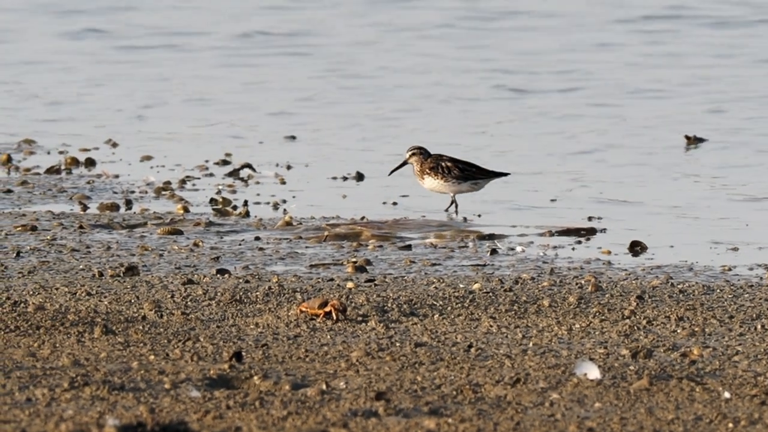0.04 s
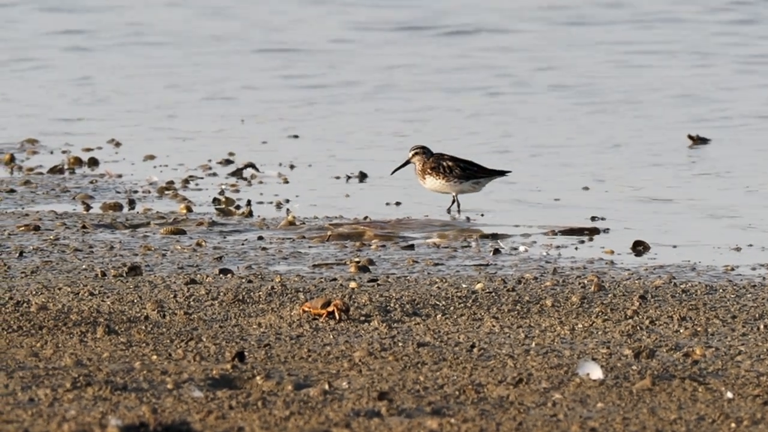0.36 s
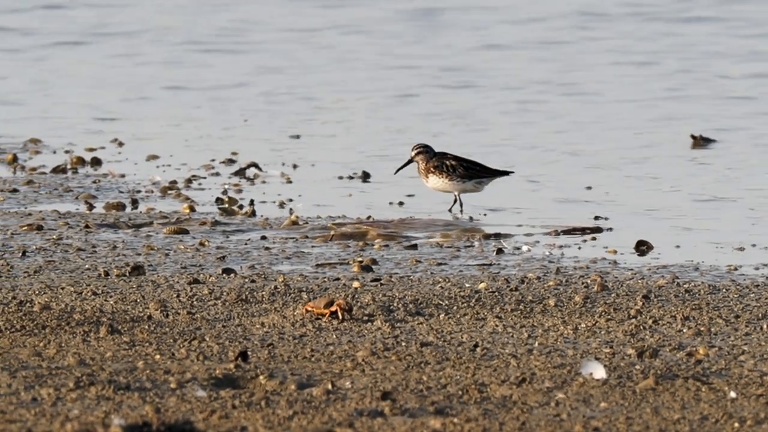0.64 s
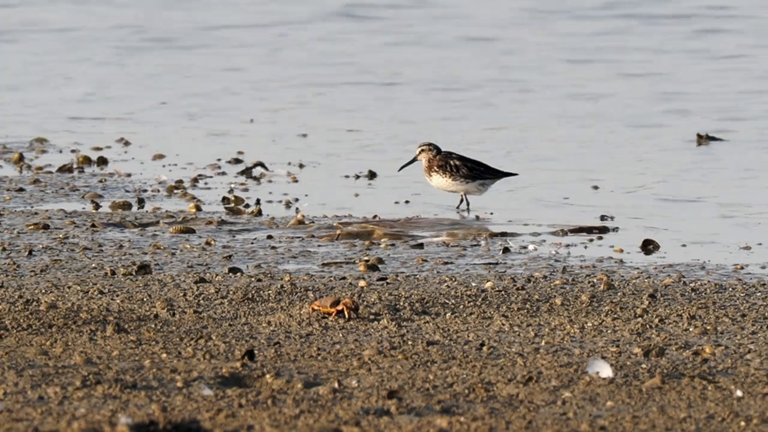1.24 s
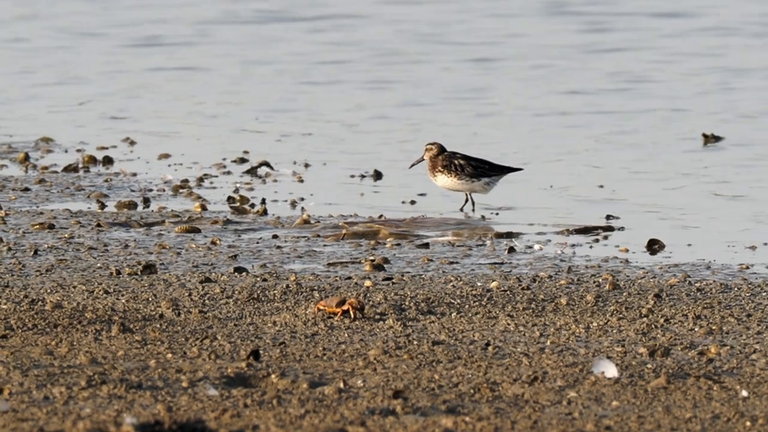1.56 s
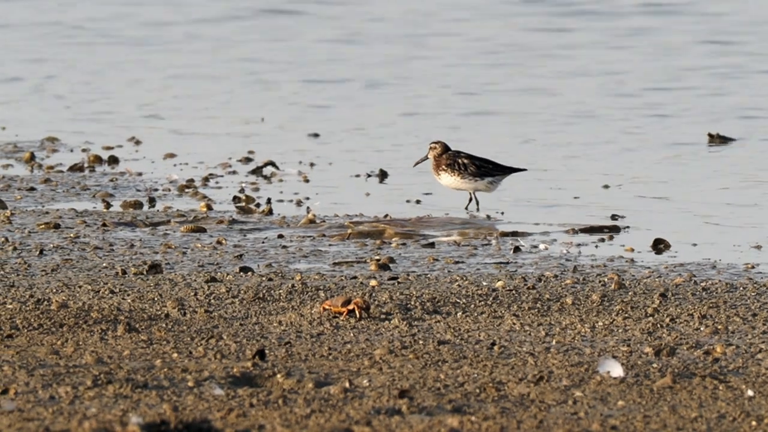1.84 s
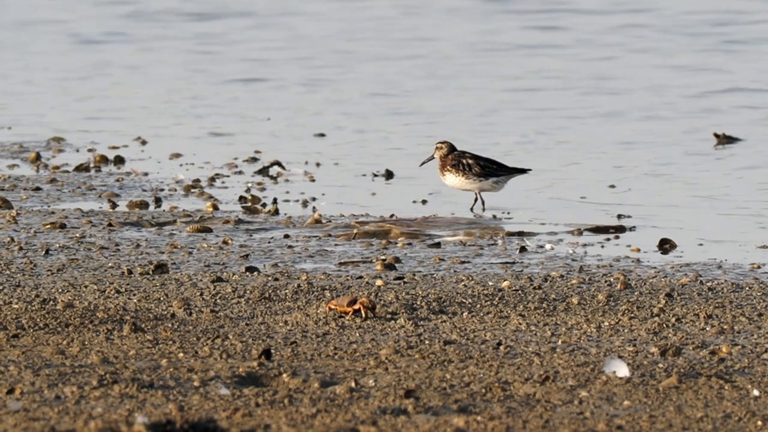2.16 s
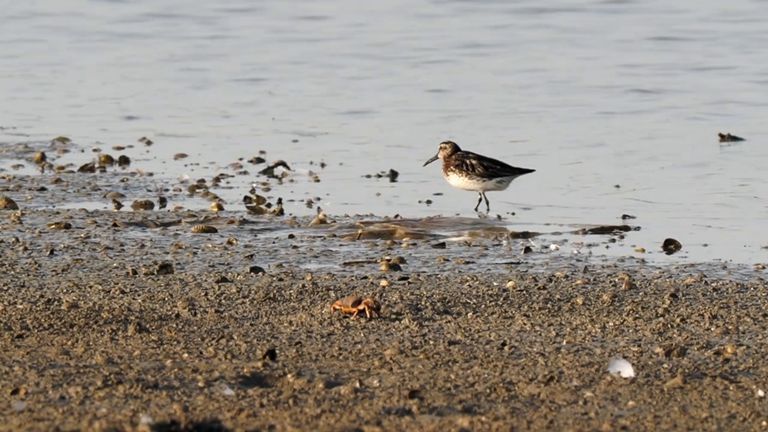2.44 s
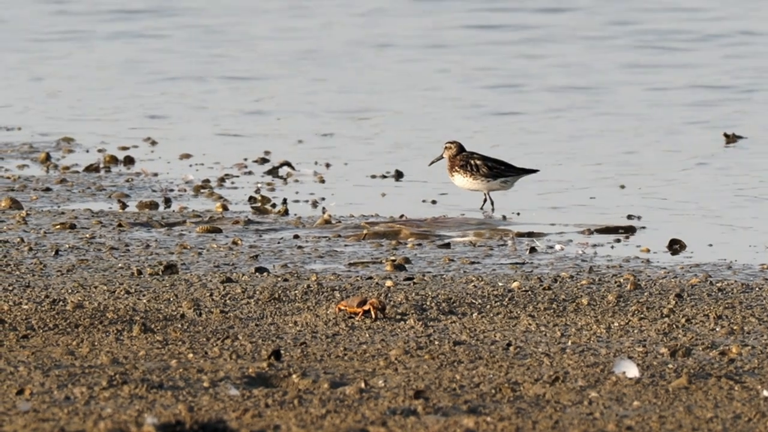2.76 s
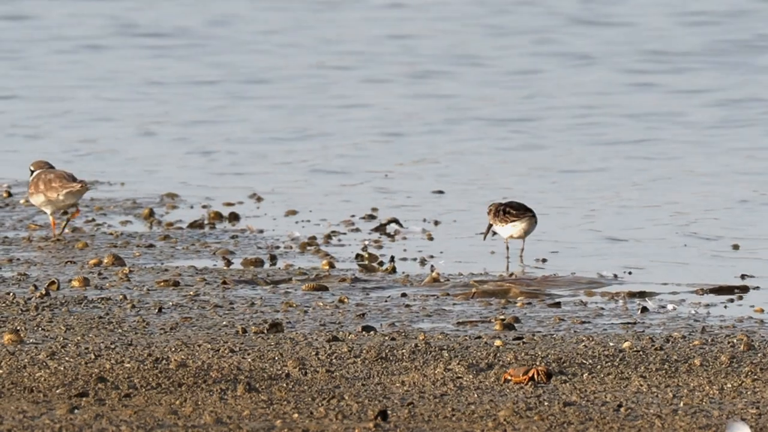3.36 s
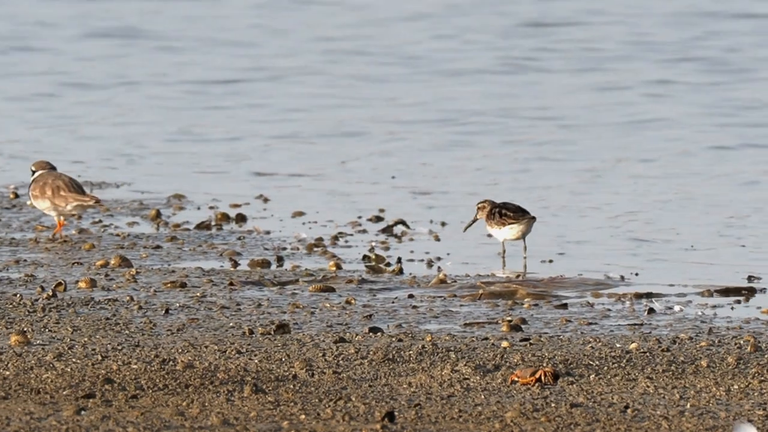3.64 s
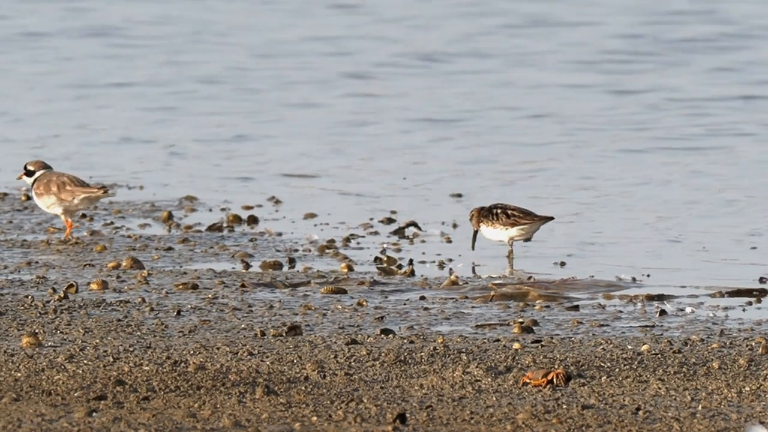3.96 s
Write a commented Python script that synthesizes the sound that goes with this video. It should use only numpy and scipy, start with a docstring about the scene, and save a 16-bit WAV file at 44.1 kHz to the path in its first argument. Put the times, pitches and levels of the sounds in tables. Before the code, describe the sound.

Equipment clicks and clatters in someone's hands while wind rumbles across a quiet shore.

```python
"""Wind rumbles and flutters on the microphone ports, on a quiet shore with a dull, distant wash, a fine hiss, a
faint whirr and a few far bird whistles. Close by, a little to the left, equipment is handled: its parts catch
and chatter in a run of short clacks that set its hollow housing ringing. A hand rubs the housing now and then.
Near the end come a soft bump, a brief drop in the background at 2.89 s and a scuff."""
import sys
import numpy as np
from scipy import signal
from scipy.fft import rfft, irfft, next_fast_len
from scipy.io import wavfile

SR = 44100
rng = np.random.default_rng(int(sys.argv[2]) if len(sys.argv) > 2 else 0)


def digitize_waveform(pressure):
    """Quantize a signal to 16-bit integers and store it at the path in sys.argv[1].

    Rows of a 2-D input are taken as channels; values are limited to [-1, 1].
    """
    field = np.atleast_2d(pressure).T
    bounded = np.clip(field, -1, 1)
    quanta = np.round(bounded * 32767).astype(np.int16)
    wavfile.write(sys.argv[1], SR, quanta)


N = 176400
T = np.arange(N) / SR


def from_db(db):
    """Turn decibels into a number to multiply by."""
    return 10 ** (np.asarray(db) / 20)


def unit_level(x):
    """Scale a sound so that its average level (rms) is 1."""
    return x / np.sqrt(np.mean(x ** 2) + 1e-20)


def level_curve(rows):
    """A gain that glides through rows of time_s, level_db."""
    return from_db(np.interp(T, *np.transpose(rows)))


def pan(db):
    """Turn the left side up and the right side down by db."""
    return from_db([[db], [-db]])


def fade(t, fade_s):
    """Full until t = 0, then 60 dB quieter every fade_s."""
    return np.exp(-np.log(1000) * np.maximum(t, 0) / fade_s)


def drift(rate_hz):
    """A smooth random wobble, about 1 in size."""
    r = np.exp(-2 * np.pi * rate_hz / SR)
    return unit_level(signal.lfilter([1], [1, -2 * r, r * r], rng.standard_normal(N + SR))[SR:])


def resonate(x, hz, width_hz):
    """Let through one band of pitches; the narrower it is, the longer it rings."""
    r = np.exp(-np.pi * width_hz / SR)
    feedback = [1, -2 * r * np.cos(2 * np.pi * hz / SR), r * r]
    return signal.lfilter(np.array([1, 0, -1]) * (1 - r * r) / 2, feedback, x + 1e-18)


def colour(x, points):
    """Shape the tone by rows of pitch_hz, gain_db; white noise keeps its overall level."""
    size = next_fast_len(N + SR // 2) // 2 * 2
    hz, db = np.transpose(points)
    log_hz = np.log(np.arange(size // 2 + 1) * SR / size + 1)
    gain = unit_level(from_db(np.interp(log_hz, np.log(hz), db)))
    # minimum phase: the filter rings after a hit, never before it
    cepstrum = irfft(np.log(gain))
    cepstrum[1:size // 2] *= 2
    cepstrum[size // 2 + 1:] = 0
    return irfft(np.exp(rfft(cepstrum)) * rfft(x, size))[..., :N]


def stereo_noise(likeness):
    """White noise: likeness 0 gives each side its own, 1 gives both the same."""
    white = rng.standard_normal((3, N))
    return np.sqrt(likeness) * white[0] + np.sqrt(1 - likeness) * white[1:]


def from_left(x, lag_s=0.0001):
    """Sound from the left reaches the right port a little later."""
    return np.array([x[0], np.interp(T - lag_s, T, x[1])])


# How the deep rumble and the flutter above it rise and fall, before their boosts: time_s, level_db
RUMBLE_LEVEL = [(0.02, -35), (.45, -36), (.51, -43), (.57, -31.5), (.7, -34), (.85, -31.5), (1.15, -34),
                (1.54, -34), (1.57, -39), (1.62, -33), (2.44, -34.5), (2.55, -39.5), (2.58, -25),
                (2.62, -38), (2.7, -31.5), (2.77, -42), (2.87, -32.5), (2.98, -39.5), (3.01, -31.5),
                (3.12, -36), (3.3, -35.5), (3.33, -41), (3.64, -35), (3.91, -42), (3.98, -32), (4.0, -42)]
FLUTTER_LEVEL = [(0.02, -46.5), (0.16, -40), (0.32, -40), (0.51, -51.5), (0.57, -43), (0.71, -60),
                 (0.75, -43.5), (0.89, -48), (1.06, -39), (1.2, -43), (1.3, -39.5), (1.91, -47),
                 (2.19, -39.5), (2.27, -56), (2.44, -35), (2.48, -45), (2.6, -40.5), (2.79, -46),
                 (2.89, -47), (2.91, -48), (4.0, -47)]
# The tone of each: pitch_hz, gain_db
RUMBLE_TONE = [(9, -24.5), (15, -0.5), (31, 1.5), (48, -1), (68, -6.5), (90, -22), (140, -31), (300, -77.5)]
FLUTTER_TONE = [(35, -20), (58, -5.5), (75, 3), (100, -5), (130, -7.5), (180, -16), (260, -33.5),
                (400, -48.5), (700, -79.5)]
# Which port the wind hits harder: time_s, left_minus_right_db
WIND_SIDE = [(0.02, 5.5), (1.13, 4), (1.17, -8), (1.72, 12), (1.75, -2), (2.68, 0), (2.86, 5), (3.46, -1),
             (4.0, 1.5)]


def wind(rumble_boost_db=4.6, flutter_boost_db=4.5, buffet_db=2.6, likeness=0.18):
    """Swirling air buffets each port mostly on its own, leaning from side to side."""
    buffets = from_db(buffet_db * np.array([drift(11.7), drift(9.6)]))
    lean = np.sqrt(level_curve(WIND_SIDE))
    ports = np.array([lean, 1 / lean]) / np.sqrt((lean ** 2 + lean ** -2) / 2)  # same total power
    rumble = unit_level(colour(stereo_noise(likeness), RUMBLE_TONE))
    rumble *= from_db(rumble_boost_db) * level_curve(RUMBLE_LEVEL)
    flutter = unit_level(colour(stereo_noise(likeness) * buffets, FLUTTER_TONE))
    flutter *= from_db(flutter_boost_db) * level_curve(FLUTTER_LEVEL)
    return ports * (rumble + flutter)


# How the distant wash rises and falls, before its boost: time_s, level_db
WASH_LEVEL = [(0.03, -61.5), (0.75, -61), (0.97, -58.5), (1.11, -62.5), (1.86, -59), (1.88, -62),
              (2.27, -56), (2.82, -61), (2.89, -61.5), (2.92, -65.5), (3.06, -63), (3.08, -58),
              (3.32, -61.5), (4.0, -61)]
# Its dull tone: pitch_hz, gain_db
WASH_TONE = [(60, -15), (130, 4), (200, 4), (300, 3), (480, -6.5), (640, -2.5), (870, -8), (1020, -7.5),
             (1300, -13.5), (1520, -10), (1780, -24), (2900, -27), (4000, -41.5), (9000, -41)]


def wash(boost_db=8.5, flicker_db=1.1):
    """The far wash of the shore: dull noise whose level flickers a little."""
    noise = colour(stereo_noise(likeness=0.74), WASH_TONE)
    gain = level_curve(WASH_LEVEL) * from_db(boost_db + flicker_db * drift(28))
    return pan(0.67) * noise * gain


# How the hiss rises and falls: time_s, level_db
HISS_LEVEL = [(0, -67), (.5, -68), (.95, -65.5), (1.12, -68.5), (1.42, -65.5), (1.88, -69.5), (2.4, -65),
              (2.87, -68), (2.91, -75), (3.04, -72), (3.09, -69), (4, -67.5)]
# Its bright tone, also used by the scuffs: pitch_hz, gain_db
HISS_TONE = [(500, -28), (3000, 13.5), (4300, 5), (7200, 6), (8300, 1.5), (10200, 5), (11300, -5),
             (12300, 2.5), (15000, 2)]


def hiss():
    """Faint, bright noise spread wide across both sides."""
    return colour(stereo_noise(likeness=0.013), HISS_TONE) * level_curve(HISS_LEVEL)


# How the whirr rises and falls, before its two parts are turned down: time_s, level_db
WHIRR_LEVEL = [(0, -67), (.5, -73.5), (.9, -70), (1.1, -87), (2.6, -80), (3.03, -79), (3.08, -65),
               (3.4, -71), (3.7, -73), (4, -83)]
# The note at its centre: time_s, pitch_hz
WHIRR_PITCH = [(0, 2286), (.9, 2243), (3.05, 2265), (3.5, 2204), (4, 2180)]


def whirr(note_db=-4.5, flicker_hz=45.5, band_db=-0.5, band_hz=2205, width_hz=520):
    """An unsteady note that sags slowly in pitch, inside a narrow band of noise."""
    phase = 2 * np.pi * np.cumsum(np.interp(T, *np.transpose(WHIRR_PITCH))) / SR
    note = unit_level(drift(flicker_hz) * np.cos(phase) + drift(flicker_hz) * np.sin(phase))
    band = resonate(stereo_noise(likeness=0.31), band_hz, width_hz)
    band = unit_level(resonate(band, band_hz, width_hz))  # a second pass narrows it
    return pan(2.3) * level_curve(WHIRR_LEVEL) * (from_db(note_db) * note + from_db(band_db) * band)


# Far bird whistles: start_s, length_s, top_pitch_hz, level_db, pitch_rise_hz, waver_hz
WHISTLES = [(0.34, 0.025, 3050, -64, 152, 16), (0.924, 0.082, 2910, -60, 200, 45),
            (1.188, 0.039, 2950, -71, 250, 40), (1.431, .085, 3000, -65, 550, 130),
            (3.822, 0.069, 2940, -64, 556, 101.7)]


def birds(arch_shape=1.48):
    """Each whistle rises and falls in pitch; a fast waver makes some of them hoarse."""
    song, waver = np.zeros(N), drift(rate_hz=90)
    for start_s, length_s, top_hz, db, rise_hz, waver_hz in WHISTLES:
        edge = np.clip(2 * (T - start_s) / length_s - 1, -1, 1) ** 2  # 1 at the ends, 0 in the middle
        pitch_hz = top_hz - rise_hz * edge ** arch_shape + waver_hz * waver
        song += from_db(db) * (1 - edge ** 2) * np.sin(2 * np.pi * np.cumsum(pitch_hz) / SR)
    return song


# Parts catching: start_s, hold_s, body_db, tick_db, main_ring_hz, second_ring_hz, ring_db
CLACKS = [(1.035, 0.002, -52.5, -64, 2650, 2030, -51), (1.247, 0.001, -70, -50.5, 3050, 7400, -66),
          (1.256, 0.0045, -46.5, -65, 1320, 1926, -50), (1.393, .001, -59, -66, 3050, 7350, -66),
          (1.521, 0.0057, -57, -58, 3090, 7300, -52), (1.561, .005, -55, -61, 1310, 7400, -62),
          (1.572, 0.005, -48.5, -44.5, 3490, 8600, -46), (1.577, 0.0072, -41, -52, 1110, 1370, -38),
          (1.678, 0.0018, -43, -57, 1090, 3390, -41.5), (1.690, 0.0025, -46.5, -48, 2910, 1670, -43.5),
          (1.768, 0.011, -46, -62, 1080, 1480, -46), (1.809, 0.004, -46.5, -63, 1620, 2223, -49),
          (1.818, 0.0094, -45.5, -65, 1343, 1630, -39.5), (1.92, .004, -63, -63, 3030, 7500, -66),
          (1.936, 0.012, -43.5, -63, 1894, 3380, -39), (1.973, 0.05, -56, -87, 2030, 1290, -45),
          (2.130, .001, -64, -51.5, 7400, 8700, -61), (2.133, 0.0011, -68, -54, 10010, 2440, -59),
          (2.145, 0.001, -61, -54.5, 10010, 8500, -56), (2.232, 0.013, -50, -53.5, 1194, 1480, -41),
          (2.247, 0.0083, -39, -49, 1261, 2274, -39), (2.27, 0.008, -44, -45.5, 2247, 3190, -39),
          (2.28, 0.0037, -43, -45.5, 1330, 8603, -44), (2.301, .009, -53, -54, 1454, 8603, -45),
          (2.87, 0.00092, -56, -74, 3740, 3560, -54), (2.877, 0.002, -51.5, -68, 3160, 1710, -52)]
# The tone of the hollow housing (body) and of its small metal parts (tick): pitch_hz, gain_db
BODY_TONE = [(300, -30.5), (650, -5), (850, -16), (1100, 2), (1350, 3.5), (1750, -2), (2300, 0), (3100, -2),
             (4000, -12), (5500, -19.5), (7500, -13.5), (9000, -56), (12000, -49)]
TICK_TONE = [(1500, -15), (3200, -2.5), (4000, -5.5), (5500, -3.5), (7300, -2), (9600, -4), (11300, -14.5),
             (13500, -9.5), (16000, -5.5)]
# The pitches at which each rings, next to the plain knock: pitch_hz, width_hz, gain_db
BODY_RINGS = [(1146, 38, -18), (1250, 29, -12), (1955, 40, -6.5), (2160, 63, -4), (2380, 30, -12),
              (3000, 30, -10)]
TICK_RINGS = [(4370, 28, 5), (4970, 120, 7), (7200, 370, 1.5), (7760, 100, -5), (8800, 74, -13),
              (9560, 100, 4), (14000, 50, -16)]


def clacks():
    """Every catch shakes both the hollow housing and the small, bright parts."""
    start_s, hold_s, body_db, tick_db, *_ = np.transpose(CLACKS)
    body_force = chatter(zip(start_s, hold_s, body_db), rise_s=0.0029, fade_s=0.064, tail_db=-7.5)
    tick_force = chatter(zip(start_s, hold_s, tick_db), rise_s=0.00036, fade_s=0.058, tail_db=-11.5)
    body = struck_part(body_force, BODY_TONE, BODY_RINGS) + lingering_rings(CLACKS)
    tick = struck_part(tick_force, TICK_TONE, TICK_RINGS)
    return pan(1.76) * body + pan(-1.1) * tick


def chatter(contacts, rise_s, fade_s, tail_db, hits_per_s=2600, spread_db=4, hit_share=0.76):
    """Each contact is a snap, a quick burst of tiny hits and a soft tail of noise."""
    hits = (rng.random(N) < hits_per_s / SR) * rng.choice([-1, 1], N)
    hits = unit_level(hits * from_db(spread_db * rng.standard_normal(N)))
    burst_power, tail_power, snaps = np.zeros((3, N))
    t = T[:SR // 2]
    for start_s, hold_s, db in contacts:
        start = int(start_s * SR)
        span = slice(start, start + len(t))
        swell = from_db(db) * (1 - np.exp(-t / rise_s))
        burst_power[span] += (swell * fade(t - hold_s, fade_s)) ** 2
        tail_power[span] += (swell * fade(t - hold_s, fade_s=0.32)) ** 2
        snaps[start] += 2 * from_db(db)
    rattle = np.sqrt(hit_share) * hits + np.sqrt(1 - hit_share) * stereo_noise(likeness=0)
    tail = from_db(tail_db) * np.sqrt(tail_power) * stereo_noise(likeness=0.81)
    return from_left(snaps + np.sqrt(burst_power) * rattle + tail)


def struck_part(force, tone, rings):
    """A part answers a hit with a broad knock and a few narrow rings."""
    knock = colour(force, tone)
    return knock + sum(from_db(db) * resonate(knock, hz, width_hz) for hz, width_hz, db in rings)


def lingering_rings(rows, rise_s=0.0037, fade_s=0.08, second_db=-4):
    """Depending on where the equipment catches, two of its pitches build up and ring on."""
    out, t = np.zeros(N), T[:SR // 2]
    shape = (1 - np.exp(-t / rise_s)) * fade(t, fade_s)
    for start_s, *_, main_hz, second_hz, db in rows:
        start = int(start_s * SR)
        pair = np.sin(2 * np.pi * main_hz * t) + from_db(second_db) * np.sin(2 * np.pi * second_hz * t)
        out[start:start + len(t)] += from_db(db) * shape * pair
    return from_left([out, out])


# Strokes of the hand: start_s, hold_s, fade_s, rub_db, hiss_db
SCUFFS = [(1.465, 0.024, 0.099, -56, -69), (2.183, 0.025, .06, -54, -73), (2.952, .003, 0.066, -57, -76),
          (3.049, 0.021, 0.16, -50.5, -88), (3.089, 0.022, 0.059, -55, -67)]
# The tone of the rubbing: pitch_hz, gain_db
SCUFF_TONE = [(200, 6.5), (600, -5.5), (1000, 3), (1450, -2), (1800, -11), (2250, -1.5), (3200, -12),
              (4500, -20), (15000, -38)]


def scuffs(roughness_db=2.0):
    """A hand rubs the housing in short, uneven strokes, each with a little fine hiss."""
    rub_gain, hiss_gain = np.zeros((2, N))
    for start_s, hold_s, fade_s, rub_db, hiss_db in SCUFFS:
        stroke = (T >= start_s) * fade(T - start_s - hold_s, fade_s)
        rub_gain += from_db(rub_db) * stroke
        hiss_gain += from_db(hiss_db) * stroke
    friction = from_db(roughness_db * drift(90)) * stereo_noise(likeness=0.94)
    rub = pan(1.3) * colour(rub_gain * friction, SCUFF_TONE)
    return from_left(rub + colour(hiss_gain * friction, HISS_TONE))


# Soft bumps on the housing: start_s, pitch_hz, fade_s, level_db, rise_s
BUMPS = [(2.234, 652, 0.12, -40, .001), (2.870, 66.4, 0.071, -13.5, .008), (2.884, 104, 0.019, -17, 0.0012),
         (2.884, 298, 0.016, -29.5, 0.00042), (3.054, 208, 0.18, -40.5, 0.0016),
         (3.065, 61, 0.26, -25.5, 0.0084)]


def bumps():
    """Each bump shakes the housing: a brief, low thud that swells and fades at its own rate."""
    out = np.zeros(N)
    for start_s, hz, fade_s, db, rise_s in BUMPS:
        t = np.maximum(T - start_s, 0)
        shape = (1 - np.exp(-t / rise_s)) * fade(t, fade_s)
        out += from_db(db) * shape * np.sin(2 * np.pi * hz * t)
    return out


def scene():
    """Handling noises over the wind and the shore."""
    return clacks() + bumps() + scuffs() + wind() + wash() + hiss() + whirr() + birds()


def record(dry):
    """Cut away the very highest treble, steeply."""
    cutoff_hz = 15900
    return signal.sosfilt(signal.ellip(10, .2, 80, cutoff_hz, fs=SR, output="sos"), dry)


dry = scene()
out = record(dry)
digitize_waveform(out)
```